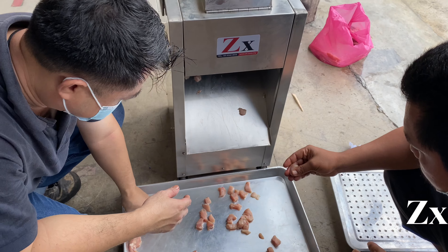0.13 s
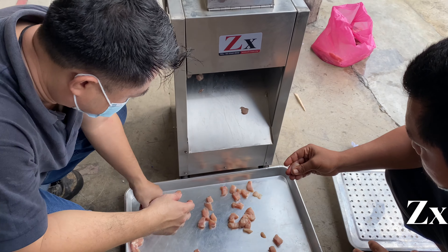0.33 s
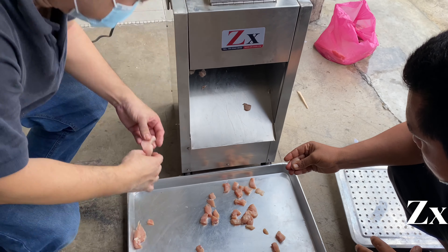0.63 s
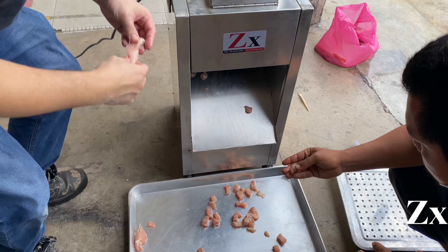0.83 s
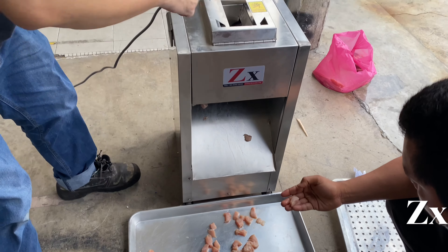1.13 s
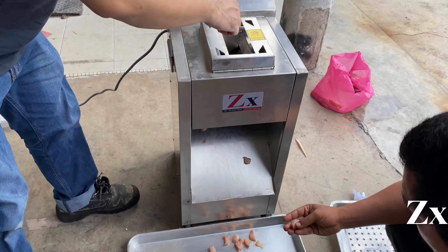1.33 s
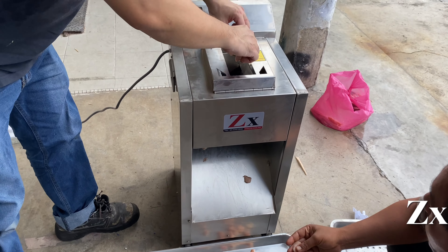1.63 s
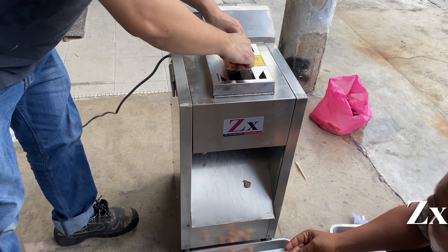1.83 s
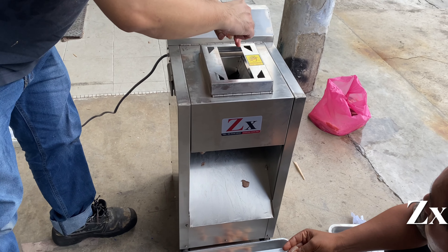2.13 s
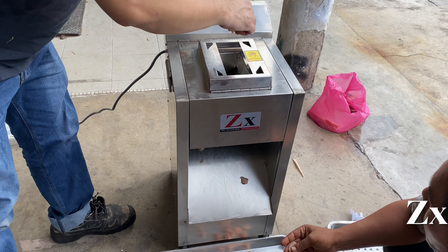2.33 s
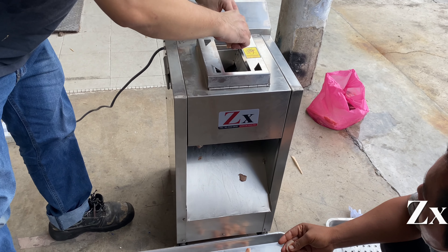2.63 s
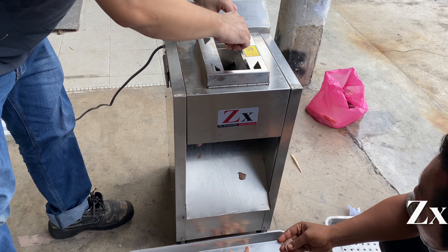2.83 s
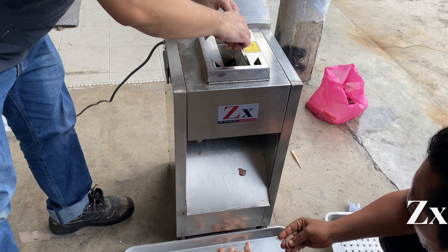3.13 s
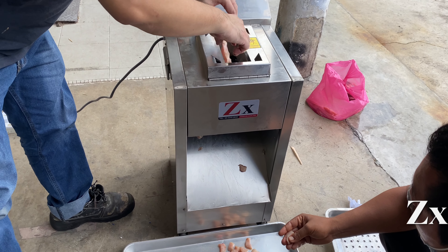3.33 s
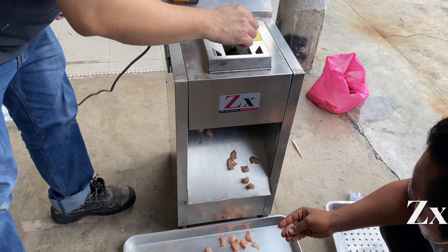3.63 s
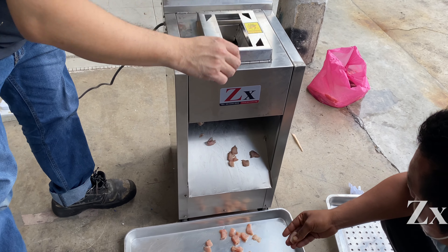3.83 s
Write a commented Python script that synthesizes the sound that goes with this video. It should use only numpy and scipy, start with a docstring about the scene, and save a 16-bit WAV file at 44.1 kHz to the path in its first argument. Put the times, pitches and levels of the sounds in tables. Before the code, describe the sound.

Meat cutting machine droning in a concrete yard, blades rasping, soft thuds and clacks, distant engines.

```python
"""On a concrete yard an electric meat slicer runs: mains hum, a droning panel and a rumbling steel cabinet,
gears that churn and hiss, chattering loose parts, and blades that scrape and ring once a turn.
Thuds and clacks sound as meat is handled and fed in; two engines drone low in the background.
Hum, drone and engines are wavering sines; all the rest is noise shaped in spectrum and level."""
import sys
import numpy as np
from scipy import signal
from scipy.fft import rfft, irfft
from scipy.io import wavfile
from scipy.ndimage import map_coordinates

SR = 44100
rng = np.random.default_rng(int(sys.argv[2]) if len(sys.argv) > 2 else 0)


def transcribe(signal):
    """Save signal, clipped to [-1, 1], as a 16-bit WAV file at the path in sys.argv[1]."""
    frames = np.atleast_2d(signal).T
    limited = np.clip(frames, -1, 1)
    pcm = np.round(limited * 32767).astype(np.int16)
    wavfile.write(sys.argv[1], SR, pcm)


N = 175959
TIME, FREQ = np.arange(N) / SR, np.fft.rfftfreq(N, 1 / SR)  # s, Hz

# relative spectrum of the hiss shared by gears and blades: f/Hz, density/dB
HISS_SPECTRUM = [(1000, -33), (3000, -6), (4200, -0.5), (5400, 2), (6800, -2), (7700, 7.5), (8400, -6.5),
                 (9500, 2.5), (10400, 1), (11500, 1), (12500, -9), (13700, 3), (15400, 7.5), (16000, -4.5)]


def amp(db):
    """Decibels to gain."""
    return 10 ** (np.asarray(db) / 20)


def unit(x):
    """Scales to an rms of one."""
    return x / np.sqrt(np.mean(x ** 2) + 1e-20)


def over_hz(points):
    """Reads a table on a log-frequency axis."""
    f, value = np.transpose(points)
    return np.interp(np.log(FREQ + 1), np.log(f + 1), value)


def over_time(points):
    """Reads each column of a control curve at every sample."""
    s, *columns = np.transpose(points)
    return [np.interp(TIME, s, column) for column in columns]


def band(hz, octaves):
    """A bell-shaped spectrum on an octave scale."""
    return np.exp(-.5 * (np.log2((FREQ + 1) / hz) / octaves) ** 2)


def wander(rate_hz):
    """Slow random motion of rms one: noise kept below about rate_hz."""
    spectrum = rfft(rng.standard_normal(N))
    return unit(irfft(spectrum * np.exp(-(FREQ / rate_hz) ** 2) * (FREQ > 0), N))


def noise(gain):
    """Noise of a given spectrum as two microphone ports pick it up, rms one."""
    # likeness of the two ports: f/Hz, correlation (0 to 1)
    likeness = [(100, .992), (160, .985), (260, .95), (450, .72), (1300, .64), (2100, .62), (2700, .58),
                (3300, .42), (4200, .2), (5400, .35), (6300, .58), (7500, .6), (8500, .85), (9100, .6),
                (10000, .9), (11200, .65), (12300, .9), (13000, .65), (14000, .88), (15300, .7)]
    # phase by which the left port leads: f/Hz, phase/rad
    port_phase = [(60, 0), (250, .2), (450, .48), (1300, .36), (2100, .4), (2700, 1.6), (3200, 2.4),
                  (4300, -.4), (5400, 0), (6400, .3), (7500, -2), (8500, -3.1), (9000, -4.1), (10000, -6.2),
                  (11200, -8.3), (12300, -9.4), (13000, -11.8), (14000, -12.6), (15700, -15.5)]
    # left port against right: f/Hz, level difference/dB
    port_balance = [(60, -2.5), (99, -1.0), (160, -2), (270, -1.5), (450, 2.5), (740, -0.5), (1220, 2.5),
                    (2010, -2.5), (3330, 0.5), (5500, 3.5), (9080, 0), (15000, 0.0)]
    left, other = rfft(rng.standard_normal((2, N)))
    same = np.clip(over_hz(likeness), -1, 1)
    lean = amp(over_hz(port_balance) / 2)
    right = same * left + np.sqrt(1 - same ** 2) * other
    right = right * np.exp(-1j * over_hz(port_phase))
    return unit(irfft(np.array([left * lean, right / lean]) * gain, N))


def ringing(modes):
    """Resonances kept ringing by random contact, each at its own level."""
    power = 0
    for hz, half_width, db in modes:
        peak = unit(1 / (1 + ((FREQ - hz) / half_width) ** 2))
        power = power + amp(db) ** 2 * peak ** 2
    return np.sqrt(power.mean()) * noise(np.sqrt(power))


def blow(start, rise_s, decay_s):
    """A quick rise and an exponential decay."""
    age = np.maximum(TIME - start, 0)
    return np.minimum(age / rise_s, 1) * np.exp(-np.maximum(age - rise_s, 0) / decay_s)


def patchy(x, centres_hz, octaves, depth_db, rate_hz):
    """Lets the region of the spectrum around each centre swell and fade on its own."""
    spectrum = rfft(x)
    shares = np.array([band(hz, octaves) ** 2 for hz in centres_hz]) + 1e-12
    shares = shares / shares.sum(0)  # the regions add up to the whole
    out = sum(irfft(spectrum * share, N) * unit(amp(depth_db * wander(rate_hz))) for share in shares)
    return unit(out) * np.sqrt(np.mean(x ** 2))


def bent(x, depth, rate_hz):
    """Bends all pitches up and down by a small share, reading the sound at a varying speed."""
    place = np.arange(N) + np.cumsum(depth * wander(rate_hz))
    return np.array([map_coordinates(channel, [place], order=5, mode="mirror") for channel in x])


def yard(x, count=24):
    """Early reflections from the floor, the tray and the walls."""
    echo_db, span_s = -12, .04
    delay = rng.uniform(.002, span_s, count)
    sign = rng.choice([-1., 1.], count)
    taps = np.bincount((delay * SR).astype(int), sign * np.exp(-delay / span_s))
    echo = signal.oaconvolve(x, taps[None] / np.linalg.norm(taps), axes=1)[:, :N]
    return (x + amp(echo_db) * echo) / np.sqrt(1 + amp(echo_db) ** 2)


def engine(curve, waver=0.17, drift_rad=0.26):
    """A distant engine: only its firing tone and the octave carry."""
    octave_db = -9
    hz, db = over_time(curve)
    phase = 2 * np.pi * (np.cumsum(hz) / SR + rng.random()) + drift_rad * wander(rate_hz=12.5)
    level = np.sqrt(2) * amp(db) * (1 + waver * wander(rate_hz=14))
    return level * (np.sin(phase) + amp(octave_db) * np.sin(2 * phase))


def traffic():
    """Two engines, one slowing down and one revving, slightly to the right."""
    # engine slowing down, levels before its trim: t/s, firing f/Hz, level/dB
    slowing = [(0, 70.8, -29), (.15, 69.46, -28), (.6, 65.7, -22.5), (.9, 62.54, -29), (1.25, 62.3, -25),
               (1.9, 58.97, -23.5), (2.3, 55.43, -26), (2.65, 53.84, -21.5), (3.1, 51.5, -38),
               (3.6, 50.1, -27), (3.99, 51.2, -29)]
    # engine revving: t/s, firing f/Hz, level/dB
    revving = [(0, 105, -30), (.3, 113, -23), (.5, 119, -32), (.85, 124, -25.5), (1.3, 124, -38),
               (2, 116, -30.5), (2.6, 107, -30), (3.1, 103, -52), (3.65, 104, -34), (3.83, 106, -21.5),
               (3.99, 108, -21)]
    slowing_trim_db = -3
    engines = amp(slowing_trim_db) * engine(slowing) + engine(revving)
    return engines * amp([[-.5], [.5]])  # left, right


def knocks():
    """Dull thuds in the cabinet and short clacks on the steel: bursts of shaped noise."""
    # thuds: t/s, level/dB
    thud_hits = [(.228, -25), (.318, -25), (.775, -19), (0.88, -16.5), (2.052, -26), (2.862, -24),
                 (3.458, -20), (3.499, -20), (3.747, -24)]
    # relative spectrum of a thud: f/Hz, density/dB
    thud_spectrum = [(20, -60), (60, -22), (110, -14), (155, -5), (215, -1), (280, -8), (450, -27),
                     (2000, -62)]
    # clacks: t/s, level/dB, centre f/Hz, width/octaves, decay/s
    clack_hits = [(.392, -26, 14000, 1, .007), (.468, -27, 480, .45, .018), (2.085, -34, 900, .6, .03),
                  (2.866, -34, 985, 0.46, .025), (3.456, -28.5, 557, 0.4, 0.047),
                  (3.627, -27.5, 600, 0.46, .018), (3.750, -23, 1450, 0.65, .006),
                  (3.756, -25, 1100, .8, .008), (3.749, -34, 5800, 0.46, .011),
                  (3.855, -28.5, 680, 0.37, 0.034), (3.935, -34, 680, 0.54, 0.019)]
    thud_envelope = sum(amp(db) * blow(s, rise_s=0.0018, decay_s=0.054) for s, db in thud_hits)
    thuds = thud_envelope * noise(amp(over_hz(thud_spectrum)))
    clacks = sum(amp(db) * blow(s, 0.002, decay) * noise(band(hz, octaves))
                 for s, db, hz, octaves, decay in clack_hits)
    return thuds + clacks


def throb(depth):
    """A swell with every turn of the motor shaft."""
    shaft_hz, peak_s = 28.27, .005
    return 1 + depth * np.cos(2 * np.pi * shaft_hz * (TIME - peak_s))


def drone():
    """One loose cabinet panel drones, wavering in pitch and strength."""
    # level of the drone: t/s, level/dB
    drone_level = [(0, -40), (.6, -38), (1.4, -31.5), (2.1, -32.5), (2.6, -30), (3.1, -30), (3.99, -32)]
    centre_hz, waver_hz, flutter = 278.7, 13.98, .35
    phase = 2 * np.pi * np.cumsum(centre_hz + waver_hz * wander(rate_hz=24.7)) / SR
    level = amp(over_time(drone_level)[0]) * (1 + flutter * wander(rate_hz=14))
    return np.sqrt(2) * level * np.sin(phase)


def mains_hum():
    """Magnetic hum: multiples of the mains frequency, drifting a little in phase and strength."""
    # hum tones: multiple of the mains, level/dB
    hum_tones = [(2, -38.5), (4, -30), (6, -44)]
    mains_hz, waver, drift_rad = 50, 0.35, 0.56
    hum = 0
    for multiple, db in hum_tones:
        level = amp(db) * np.sqrt(2) * (1 + waver * wander(rate_hz=8))
        drift = drift_rad * wander(rate_hz=1.47)
        hum = hum + level * np.sin(2 * np.pi * round(multiple) * mains_hz * TIME + drift)
    return hum


def motor():
    """Mains hum, a droning panel, and the cabinet rumbling and ringing with the shaft."""
    # relative spectrum of the rumble: f/Hz, density/dB
    rumble_spectrum = [(15, -55), (28, -44), (42, -18), (54, 0.5), (80, 0), (115, -4), (150, 0.5),
                       (230, -3), (330, -7.5), (500, -19.5), (1000, -45), (4000, -78)]
    # level of the rumble before its trim: t/s, level/dB
    rumble_level = [(0, -22.3), (.7, -22), (1.25, -21), (1.6, -23), (2.6, -22), (3.3, -23.5), (3.6, -21),
                    (3.99, -21)]
    # cabinet resonances: f/Hz, half-width/Hz, level/dB
    panels = [(202.2, 12.8, -29), (279.7, 12.6, -36), (440, 32, -38.7), (615, 18, -43.5), (801, 18, -45),
              (1249, 45, -46)]
    trim_db = -0.36
    rumble = amp(over_time(rumble_level)[0] + trim_db) * noise(amp(over_hz(rumble_spectrum)))
    return mains_hum() + drone() + (rumble + ringing(panels)) * throb(depth=.13)


def grit():
    """Loose parts chatter: tiny random knocks, each dying in a few milliseconds."""
    # chatter bands: centre f/Hz, width/octaves, level/dB
    grit_bands = [(520, 0.33, -41), (1160, 0.41, -42), (2290, 0.49, -45)]
    knocks_per_s, spread_db, decay_s = 150, 3.5, 0.0027
    out = 0
    for hz, octaves, db in grit_bands:
        strength = amp(spread_db * np.minimum(rng.exponential(1, N), 2))
        hits = (rng.random(N) < knocks_per_s / SR) * strength
        power = signal.lfilter([1], [1, -np.exp(-2 / (decay_s * SR))], hits ** 2)
        out = out + amp(db) * unit(np.sqrt(power)) * noise(band(hz, octaves))
    return out


def rub():
    """Contact of the blade discs with their combs, once a turn, slightly uneven in timing."""
    roller_hz, lead_s, slip_s = 9.1, 0.013, 0.0024
    rise_s, hold_s, decay_s = 0.02, 0.031, 0.017  # the hold counts from the start of the rise
    age = (TIME + lead_s + slip_s * wander(rate_hz=5)) % (1 / roller_hz)
    return np.minimum(age / rise_s, 1) * np.exp(-np.maximum(age - hold_s, 0) / decay_s)


def gears(flicker_db=0.8, hiss_flicker_db=1.02, surge_db=0.97, fizz_db=.7):
    """An uneven churn of teeth under a hiss that flutters with the shaft."""
    # relative spectrum of the churn: f/Hz, density/dB
    churn_spectrum = [(100, -0.5), (330, -3.5), (540, -2), (720, -1), (1250, -2), (1700, -5.5),
                      (2300, -7.5), (3000, -9), (3800, -19), (6000, -25), (16000, -47)]
    # level of the churn before its trim and roll: t/s, level/dB
    churn_level = [(0, -28), (.3, -32), (1, -29.5), (1.9, -30), (2.1, -26.5), (2.2, -33.5), (2.3, -30.5),
                   (2.65, -30.5), (2.88, -28.5), (3.05, -31), (3.65, -30), (3.99, -29.5)]
    churn_trim_db, churn_roll = -0.2, 0.087
    hiss_start_db, hiss_fade_db_per_s = -33.5, -0.65
    flicker = wander(rate_hz=29)  # shared by churn and hiss
    churn_db = over_time(churn_level)[0] + churn_trim_db + flicker_db * flicker
    churn = patchy(noise(amp(over_hz(churn_spectrum))), [500, 1200, 3000], 0.85, surge_db, rate_hz=16)
    churn = amp(churn_db) * (1 + churn_roll * rub()) * churn
    hiss_db = hiss_start_db + hiss_fade_db_per_s * TIME + hiss_flicker_db * flicker
    hiss = patchy(noise(amp(over_hz(HISS_SPECTRUM))), [4000, 7500, 14000], .5, fizz_db, rate_hz=59)
    return churn + amp(hiss_db) * hiss * throb(depth=.1)


def blades(uneven_db=0.44, grit_db=.5):
    """The blade discs ring as they rub, a little differently each turn; some rubs rasp harder."""
    # blade resonances: f/Hz, half-width/Hz, level/dB
    blade_modes = [(1945, 48, -51), (2123, 27, -46), (2430, 35, -50.5), (2820, 63, -54.5), (3253, 30, -50),
                   (3760, 250, -50.5), (4770, 420, -49.5), (5060, 130, -53), (5430, 88, -52),
                   (6280, 65, -48.5), (6150, 490, -45.5), (7524, 28, -52), (9090, 66, -48), (9692, 70, -56),
                   (11220, 86, -48), (13700, 900, -47)]
    # harder rubs: t/s, level/dB, decay/s
    rasp_hits = [(.005, -32.5, .06), (0.424, -32.5, .055), (.56, -37, .04), (0.881, -33, 0.049),
                 (.99, -32, .05), (1.1, -35.5, .04), (1.555, -34.5, 0.057), (1.67, -42, 0.046),
                 (1.789, -37, .04), (2.059, -28.5, .065), (2.805, -31.5, .045)]
    rest_force, hiss_db, swap_db = 0.82, -45.5, 1.16  # rest_force stays on between scrapes
    roughness_db = uneven_db * wander(rate_hz=5.7) + grit_db * wander(rate_hz=110)
    force = unit((rest_force + rub()) * amp(roughness_db))
    ring = patchy(ringing(blade_modes), [2100, 3200, 5030, 6300, 8000, 13000], 0.22, swap_db, rate_hz=26)
    ring = bent(ring, depth=.004, rate_hz=4.99)
    hiss = amp(hiss_db) * noise(amp(over_hz(HISS_SPECTRUM)))
    rasp_envelope = sum(amp(db) * blow(s, 0.007, decay) for s, db, decay in rasp_hits)
    rasps = rasp_envelope * noise(band(hz=2080, octaves=0.27))
    return force * (ring + hiss) + rasps


def scene():
    """The slicer in front, traffic slightly to the right; gears and chatter reflect off the yard."""
    return traffic() + knocks() + motor() + yard(gears() + grit()) + blades()


def record(dry):
    """Band limit of the recorder: a steep low-pass that closes the top of the treble."""
    edge_hz = 15850
    lowpass = signal.firwin(601, edge_hz, window=("kaiser", 9), fs=SR)
    return signal.oaconvolve(dry, lowpass[None], "same")


dry = scene()
out = record(dry)
transcribe(out)
```